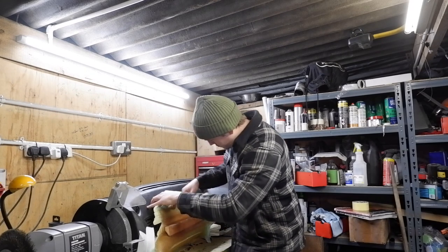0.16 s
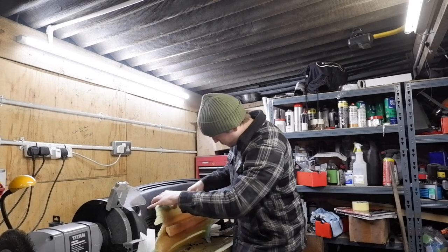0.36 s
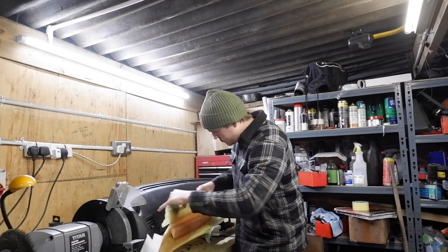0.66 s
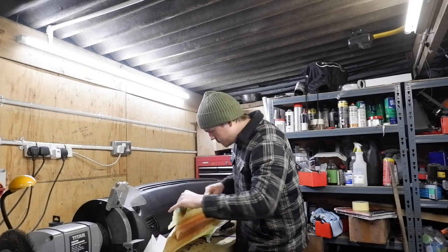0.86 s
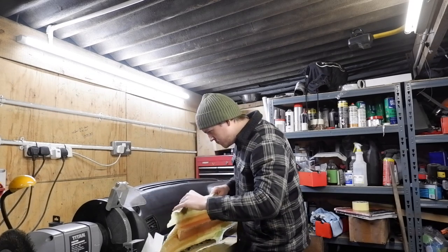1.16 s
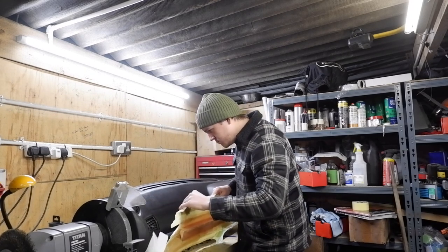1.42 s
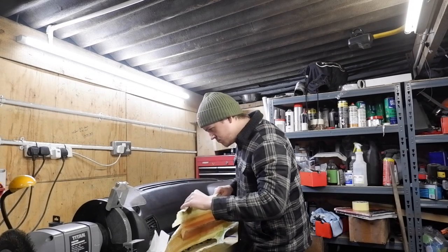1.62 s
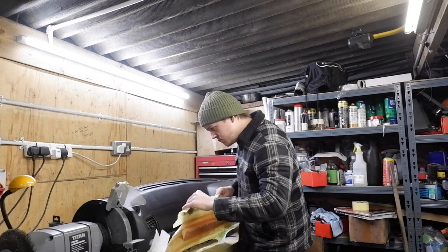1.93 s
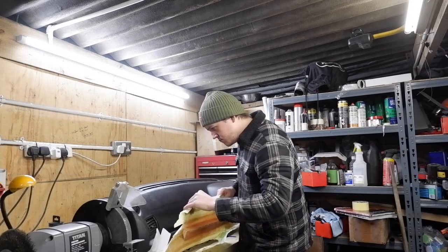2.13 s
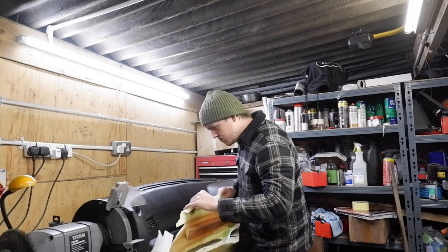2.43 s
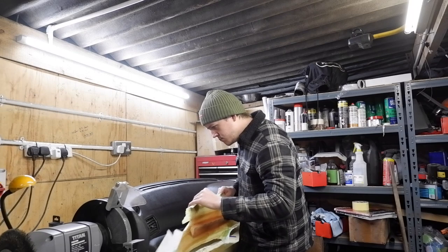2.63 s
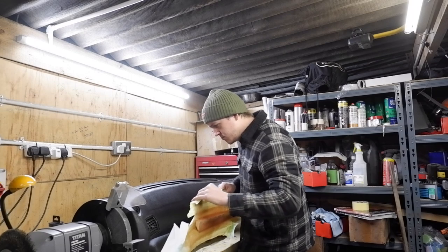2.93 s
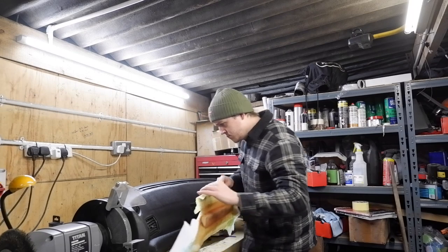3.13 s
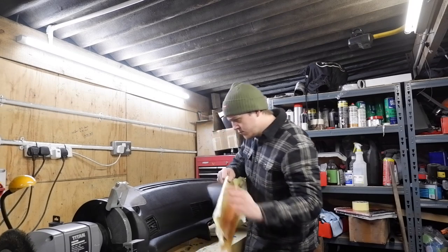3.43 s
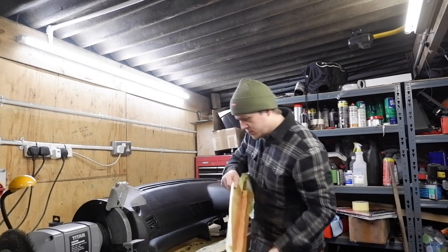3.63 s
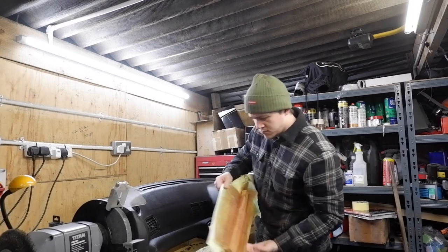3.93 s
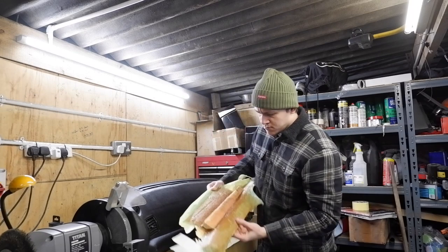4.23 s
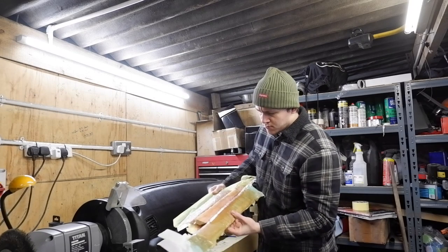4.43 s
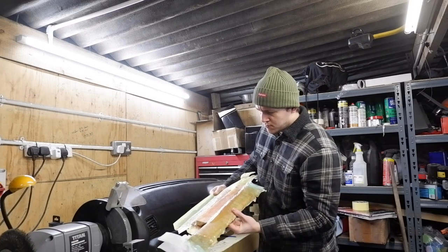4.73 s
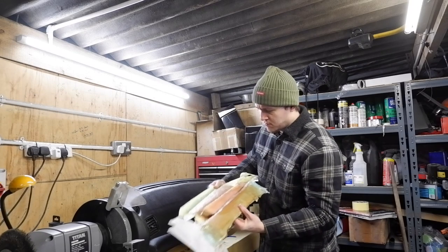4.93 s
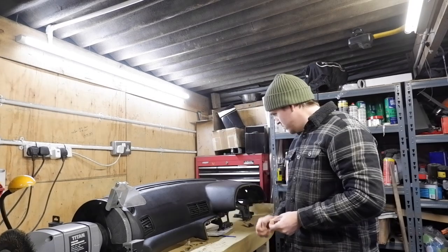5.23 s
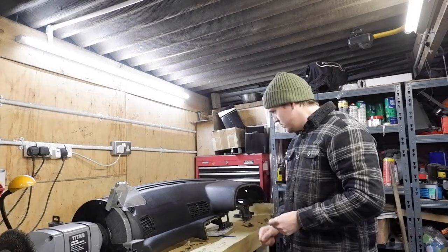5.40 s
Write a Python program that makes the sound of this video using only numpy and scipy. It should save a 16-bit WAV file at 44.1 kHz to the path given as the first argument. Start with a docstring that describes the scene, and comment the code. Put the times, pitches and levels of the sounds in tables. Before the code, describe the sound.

In a small cluttered garage, a stiff moulded shell is pried from a hollow plastic dashboard. Sharp clicks and crackle come thick and loud in the first second, with soft bumps and small squeaks, then thin out. A short creaking flurry follows past two seconds, a splintering burst near four, then quiet handling. Close stereo microphones pick up a short room tail, faint rumble and hiss.

```python
"""A stiff layered mould is peeled off a car dashboard in a small garage, over a faint rumble and hiss.
At first soft bumps, fine crackle and squeaks surround clicks that are strongest within the first second.
Sparser clicks, creaks and crackle follow, with a short flurry at 2.3 s; loud splintering cracks come
near 4.1 s, then quiet handling with two last soft bumps. Cracks and tears are shaped pulses with noisy
rattles, peeling is coloured noise and slips, squeaks are unsteady tones, and bumps are fading low swings."""
import sys
import numpy as np
from scipy import signal
from scipy.fft import rfft, irfft
from scipy.io import wavfile
from scipy.ndimage import uniform_filter1d

SR = 44100
rng = np.random.default_rng(int(sys.argv[2]) if len(sys.argv) > 2 else 0)


def int16_out(signal):
    """Quantize to a 16-bit WAV file."""
    q = np.round(np.clip(np.atleast_2d(signal).T, -1, 1) * 32767)
    wavfile.write(sys.argv[1], SR, q.astype(np.int16))


N = 245195  # length in samples


def cracks(scatter_db=2.5, direct_db=-2.2, run_up_db=-2):
    """Snapping fibres swell up to one sharp pulse; the shell and the surfaces near it rattle after."""
    # single breaks of the bond: start_s, strength_db (relative), pitch_hz,
    # knock_db, snap_db, tick_db (all relative to the strength),
    # clean_share (0-1, limited below: share of the power in one direct pulse)
    breaks = [(0.1824, 2, 1270, -14, -8, -18, 0.063), (0.2309, -2, 1400, -8, -9, -17, 0.024),
              (0.2467, 6.5, 1790, -3, -9, -22, 0.5), (0.25, -9, 1440, -9, 15.5, -0.5, 0.13),
              (0.2944, -4.5, 1940, 3.5, 1.5, 6.5, 0.21), (0.3009, -6, 1820, -4, 5, -3.5, .2),
              (0.4205, -2, 1210, -9, -10, -17.5, 0.17), (0.5623, -1, 1670, -22, -1, -12, 0.4),
              (0.572, -6.5, 1430, -5, -3, -5.5, 0.35), (0.634, 0.5, 1350, -16, -12, -6, 0.24),
              (0.689, 14.5, 1430, -15.5, -5, -22.5, 0.74), (0.8339, -13, 1620, -8, -6, 1.5, .15),
              (0.8697, 19, 1520, -9.5, -8.5, -21, 0.7), (0.9484, 8.5, 1230, -6.5, -3.5, -8, 0.11),
              (0.9581, 10, 1360, -9, -17, -30, 0.74), (0.999, 6.5, 1440, -19, -17, -23, .25),
              (1.0246, 8, 1610, -13.5, -7.5, -16, 0.63), (1.0358, 3.5, 1340, -6, -4, -12.5, .08),
              (1.0938, 0.5, 1530, -9, -9, -13.5, .2), (1.2696, -12, 2300, 9, 0, -8, 0.46),
              (1.466, -3.5, 1500, 5, 4, -10, .3), (1.5088, 3.5, 1980, -12, -11, -6, 0.24),
              (1.5318, 1, 2200, -7, -1, -12, 0.058), (1.6298, -10.5, 2400, -4, -6, -7, 0.16),
              (1.7097, -16.5, 1540, -10, -5, -4, .1), (1.8098, -19.5, 1650, 1, -3, -2, 0.6),
              (1.964, -9, 2380, -9, -10, -14, 0.51), (2.0104, -7.5, 1880, -29, -10, -13.5, 0.52),
              (2.102, -6.5, 2080, -10.5, -11, -9.5, 0.17), (2.231, -0.5, 2040, -32, -4.5, -4.5, .18),
              (2.298, -8, 1630, 5, -8, -6, 0.18), (2.3111, -3, 1720, 6, 1, -7, 0.11),
              (2.342, 14, 2220, -11, -2, -11, 0.67), (2.3512, -3.5, 1820, 4.5, -2, -7, 0.078),
              (2.382, 2.5, 1620, 1.5, -8, -13, 0.16), (2.594, -8, 1150, 6.5, -2, -6.5, 0.052),
              (2.68, 1.5, 1120, -1, -4.5, -15, 0.11), (2.7643, -21, 1380, 20, -8, -12, 0.44),
              (3.114, -8.5, 1630, 1, 2, -7.5, 0.23), (3.363, -9.5, 1450, -2, 5, -4.5, .02),
              (3.5142, -1.5, 1700, -0.5, 1, -26, 0.15), (3.9885, -3, 1450, -8, -5, -5, .02),
              (4.0645, -17, 1580, 8, 5, 0.5, .05), (4.0919, 10, 1750, -13, -1, 2, 0.3),
              (4.107, 10, 1620, -13.5, -4.5, -1.5, 0.13), (4.119, 11.5, 1800, -12.5, -21, 1, 0.38),
              (4.1226, 10, 1930, -14, -11, 3, 0.035), (4.1284, 7, 1740, -16, -1, 0.5, 0.11),
              (4.131, 8, 1500, -2, 4.5, 0.5, 0.045), (4.8467, -7, 1790, -18, -5, -4.5, 0.049),
              (4.864, -6, 1540, 6.5, -2, -13, 0.23)]
    # the less clean a crack, the longer its fibres give way before it
    shortest_run_up_s, extra_run_up_s, clean_scale = 0.00057, 0.014, 0.077
    direct, rattle = np.zeros(N), np.zeros(N)
    t = np.arange(-SR // 50, SR // 8) / SR  # seconds around the break
    decay = rattle_decay(t)
    for start_s, strength_db, pitch_hz, knock_db, snap_db, tick_db, clean_share in breaks:
        pulse = crack_pulse(strength_db, pitch_hz, knock_db, snap_db, tick_db)
        share = np.clip(clean_share, .01, .7)
        run_up_s = shortest_run_up_s + extra_run_up_s * np.exp(-share / clean_scale)
        swell = amp(run_up_db) * np.exp(-abs(t) / run_up_s)
        paths = echo_paths(t) * np.where(t < 0, swell, decay)
        paths /= np.linalg.norm(paths[t >= 0])
        add(direct, start_s, np.sqrt(share) * pulse)
        add(rattle, start_s + t[0], np.sqrt(1 - share) * signal.fftconvolve(paths, pulse))
    return amp(direct_db) * disperse(direct) + amp(scatter_db) * panel(rattle)


def crack_pulse(strength_db, pitch_hz, knock_db, snap_db, tick_db,
                spread=1.19, sub_db=-24, low_db=-4, air_db=-5, top_db=-11):
    """The pulse of one break: a low knock, a broad hump at its pitch, a snap and a bright edge."""
    # the snap lies higher under a brighter tick: 0.12 octave per dB
    snap_hz = max(4240 * 2 ** (0.12 * tick_db), pitch_hz * spread ** 2)
    low = [(60, knock_db + sub_db), (180, knock_db + low_db), (390, knock_db)]
    hump = [(pitch_hz / spread, 0), (pitch_hz * spread, 0), (snap_hz, snap_db)]
    edge = [(6500, tick_db), (8600, tick_db), (10500, tick_db + air_db), (16000, tick_db + top_db)]
    return amp(strength_db) * causal(sorted(low + hump + edge))


def echo_paths(t, lumpy_db=2.0, uneven_db=3.0):
    """Every break lies at another place: its echoes arrive in other clumps and favour other pitches."""
    clumps = unit(uniform_filter1d(rng.standard_normal(len(t)), size=40))
    paths = rfft(rng.standard_normal(len(t)) * amp(lumpy_db * clumps))
    favour = unit(uniform_filter1d(rng.standard_normal(len(paths)), size=50))
    return irfft(paths * amp(uneven_db * favour), len(t))


def rattle_decay(t, scatter_t60_s=.13, near_t60_s=.035, near_db=-2):
    """The room's first echoes and the shell's own brief ring each fade by 60 dB in their t60."""
    return amp(-60 * abs(t) / scatter_t60_s) + amp(near_db - 60 * abs(t) / near_t60_s)


def disperse(x):
    """Bending waves cross the shell faster at high pitch, so a pulse swings both ways."""
    lag = .45  # all-pass filter: delays low pitches more, changes no level
    return signal.lfilter([-lag, 1], [1, -lag], x)


def panel(x, broad_db=-2):
    """The hollow panels pass everything and ring on at their resonances."""
    # resonances of the dashboard and the shell: centre_hz, width_hz, level_db (over the broad response)
    resonances = [(163, 15, 3), (392, 24, 7), (584, 20, 4), (793, 57, -4), (1080, 25, 4), (1525, 56, -4),
                  (2010, 45, -7.5), (2500, 220, -11)]
    out = amp(broad_db) * x
    for centre_hz, width_hz, level_db in resonances:
        ringing = signal.lfilter(*signal.iirpeak(centre_hz, centre_hz / width_hz, SR), x)
        out = out + amp(level_db + broad_db) * ringing
    return out


def tears(level_db=2.0, smear=1.8, smear_t60_s=0.11):
    """The bond lets go as a swarm of small breaks at random moments, each with its own short rattle."""
    # runs of crackle where the bond tears or the shell scrapes: start_s, length_s,
    # strength_db (relative, whole run), pitch_hz, knock_db, snap_db, tick_db (relative to the strength)
    runs = [(0.0, 0.037, -11.5, 1300, 6, -10, -15), (0.195, 0.19, 0.5, 1550, -4.5, 3, -5),
            (0.522, 0.072, 0, 1200, -3.5, -10, -13), (0.65, 0.022, -5, 1450, -13, 1, -13),
            (0.775, 0.035, -4, 1350, -16, -11, -17), (1.031, 0.059, 9.5, 1380, -7.5, -12.5, -18.5),
            (1.175, 0.081, -2.5, 2440, -7.5, -3, -9.5), (1.33, 0.16, -20, 1390, 18, -11, -3),
            (1.485, 0.047, -7, 2020, 5.5, 3, -11), (2.335, 0.16, 5.5, 1550, 1.5, -2, -8.5),
            (2.6, 0.15, -3.5, 1100, 2.5, -1, -8), (3.315, 0.14, -1.5, 1140, 3.5, -7.5, -11.5),
            (3.518, 0.072, 3, 1600, -9, -3, -16.5), (3.7, 0.18, -16, 1200, 11.5, -6, -3),
            (4.31, 0.09, -11.5, 1430, 0, -2, -13)]
    slips_per_s, slip_spread_db = 460, 4.0
    skew = 0.48  # a run swells quickly and dies away more slowly
    out = np.zeros(N)
    keep = amp(-60 / (smear_t60_s * SR)) ** 2  # power left after one sample
    for start_s, length_s, *tone in runs:
        chance = rng.random(SR // 3)
        size, echoes = rng.standard_normal((2, SR // 3))
        progress = np.minimum(np.arange(len(size)) / (length_s * SR), 1)
        swell = np.sin(np.pi * progress ** skew)
        slips = (chance < slips_per_s / SR) * amp(slip_spread_db * size) * swell
        rattle_power = signal.lfilter([1 - keep], [1, -keep], slips ** 2)
        rattle = smear * np.sqrt(rattle_power) * echoes
        swarm = slips * rng.choice([-1, 1], len(slips)) + rattle
        swarm = swarm / (np.linalg.norm(swarm) + 1e-12)
        add(out, start_s, signal.fftconvolve(swarm, crack_pulse(*tone)))
    return amp(level_db) * panel(disperse(out))


def peeling(rub_db=-46, fizz_db=-49, ring=0.29):
    """The shell rubs dully, stirring the panels, while fine bond threads snap; both follow the effort."""
    # how hard the shell is pulled and handled: time_s, effort_db (relative)
    pull = [(0.0, -9.5), (0.4, -9.5), (0.83, -4.5), (1.07, 2.5), (1.24, -11), (1.5, -3.5), (1.76, -18.5),
            (2.03, -13.5), (2.53, -16), (2.67, -8.5), (3.2, -11.5), (3.45, -5.5), (4.0, -8.5), (4.35, -4.5),
            (4.62, -12), (5.2, -17.5), (5.55, -16)]
    # colour of the dull rubbing: pitch_hz, level_db (relative, per Hz)
    rub_colour = [(60, -26), (150, -5.5), (380, 1), (700, -1.5), (1400, -3), (2400, -8.5), (4000, -13),
                  (9000, -29)]
    # colour of the snapping threads: pitch_hz, level_db (relative, per Hz)
    fizz_colour = [(500, -21), (2200, -1.5), (5000, 0), (9000, -1), (16000, -15)]
    fizz_growth = 1.24  # dB of fine crackle for each dB of effort
    effort_db = np.interp(np.arange(N) / SR, *np.transpose(pull))
    slips = colour(grains(per_s=410, spread_db=3.5, smear_t60_s=0.078, smear=1.85), rub_colour)
    rub = wandering(slips + ring * panel(slips), patchy_db=1.5)
    threads = colour(grains(per_s=710, spread_db=2.0, smear_t60_s=0.094, smear=2.5), fizz_colour)
    fizz = wandering(threads, patchy_db=4.0)
    return amp(rub_db + effort_db) * rub + amp(fizz_db + fizz_growth * effort_db) * fizz


def grains(per_s, spread_db, smear_t60_s, smear):
    """Tiny slips at random moments, a few much larger than the rest, each with its own short rattle."""
    size = amp(spread_db * np.minimum(rng.exponential(1, N), 4))
    train = size * rng.choice([-1, 1], N) * (rng.random(N) < per_s / SR)
    keep = amp(-60 / (smear_t60_s * SR)) ** 2  # power left after one sample
    power = signal.lfilter([1 - keep], [1, -keep], train ** 2)
    return unit(train + smear * np.sqrt(power) * rng.standard_normal(N))


def wandering(x, patchy_db):
    """The point of contact moves, so different pitches stand out from moment to moment."""
    z = signal.stft(x, nperseg=1024, noverlap=768)[2]
    patches = uniform_filter1d(rng.standard_normal(z.shape), size=7, axis=0)  # blurred over pitch
    patches = uniform_filter1d(patches, size=8, axis=1)  # and over time
    patchy = z * amp(patchy_db * unit(patches))
    return unit(signal.istft(patchy, nperseg=1024, noverlap=768)[1][:N])


def squeaks():
    """Uneven stick-slip gives a brief fuzzy tone whose pitch changes every couple of cycles."""
    # squeaks and creaks of the shell on the plastic and in the hands:
    # start_s, length_s, pitch_hz, level_db, jitter (pitch wander as a share of the pitch)
    chirps = [(0.42, 0.029, 4420, -56, .05), (0.522, 0.035, 3720, -43, 0.052),
              (0.529, 0.033, 567, -46, 0.15), (1.185, 0.053, 386, -47.5, 0.16),
              (1.946, 0.099, 5030, -59, 0.095), (2.357, 0.056, 403, -39, 0.081),
              (2.595, 0.13, 390, -47.5, 0.1), (2.68, 0.012, 780, -39, 0.029),
              (2.758, 0.017, 496, -47.5, 0.083), (2.761, 0.06, 7860, -56, 0.091),
              (3.315, 0.047, 623, -47.5, 0.12), (3.518, 0.037, 268, -51, 0.047),
              (4.315, .1, 404.6, -57.5, 0.185)]
    out = np.zeros(N)
    for start_s, length_s, pitch_hz, level_db, jitter in chirps:
        wander = uniform_filter1d(rng.standard_normal(SR // 4), size=int(2 * SR / pitch_hz))
        wander = unit(wander)[:round(length_s * SR)]
        tone = np.sin(2 * np.pi * np.cumsum(pitch_hz * (1 + jitter * wander)) / SR)
        faded = tone * signal.windows.tukey(len(tone), .5)
        add(out, start_s, amp(level_db) * unit(faded))
    return out


def bumps(t60_s=0.14, rise_s=0.0013):
    """A soft push starts one low, damped swing."""
    # soft bumps of the body and the work against the bench: start_s, pitch_hz, level_db (before the fade)
    pushes = [(0.084, 175, -48), (.33, 166, -45.5), (.36, 81.5, -46), (.435, 98, -52), (0.445, 167, -44.5),
              (0.891, 190, -39), (5.188, 127, -51), (5.482, 133, -49)]
    out, t = np.zeros(N), np.arange(SR // 4) / SR
    for start_s, pitch_hz, level_db in pushes:
        envelope = amp(level_db - 60 * t / t60_s) * (1 - np.exp(-t / rise_s))
        add(out, start_s, envelope * np.sin(2 * np.pi * pitch_hz * t))
    return out


def garage(x):
    """One diffuse tail of the small, cluttered room, each band dying at its own speed."""
    # echo decay of the garage: pitch_hz, t60_s (time to fade by 60 dB)
    fade_times = [(150, 0.7), (500, 0.24), (1500, 0.32), (6000, 0.4), (10000, 0.27), (15000, 0.3)]
    hz, t, z = signal.stft(rng.standard_normal(SR // 2), SR, nperseg=256)
    build_up = 1 - np.exp(-t / 0.0022)
    fade = amp(-60 * t / read(fade_times, hz)[:, None])
    tail = signal.istft(z * build_up * fade, SR, nperseg=256)[1]
    return signal.fftconvolve(x, tail / np.linalg.norm(tail))[:N]


def noise(points, level_db):
    """Steady noise: random values given a spectrum, then set to an rms level."""
    spectrum = rfft(rng.standard_normal(N))
    shape = amp(read(points, np.fft.rfftfreq(N, 1 / SR)))
    return amp(level_db) * unit(irfft(spectrum * shape, N))


def amp(db):
    """Decibels to gain."""
    return 10 ** (np.asarray(db) / 20)


def unit(x):
    """Scales to rms 1."""
    return x / np.sqrt(np.mean(x ** 2) + 1e-20)


def read(points, hz):
    """Reads a (Hz, value) table on a log-frequency axis."""
    f, value = np.transpose(points)
    return np.interp(np.log(hz + 1), np.log(f + 1), value)


def add(mix, start_s, sound):
    """Mixes a sound in at a time, cutting off what runs past the end."""
    part = mix[max(round(start_s * SR), 0):][:len(sound)]
    part += sound[:len(part)]


def causal(points, size=2048):
    """The pulse with a given (Hz, dB) spectrum whose energy comes as early as possible."""
    cepstrum = irfft(np.log(amp(read(points, np.fft.rfftfreq(size, 1 / SR)))))
    # folding the second half onto the first leaves nothing before the start
    cepstrum[1:size // 2] *= 2
    cepstrum[size // 2 + 1:] = 0
    return irfft(np.exp(rfft(cepstrum)))


def colour(x, points):
    """Filters a signal with a (Hz, dB) spectrum."""
    return signal.oaconvolve(x, causal(points))[:len(x)]


def scene(room_db=-9):
    """Two closely spaced microphones hear the same room; each adds its own hiss."""
    # colour of the room tone: pitch_hz, level_db (relative, per Hz)
    hush_colour = [(25, -9), (60, -3.5), (130, 2.5), (300, 0.5), (550, -4), (1250, -13), (1440, -9.5),
                   (1650, -14.5), (3000, -20.5), (9000, -21), (16000, -66)]
    # colour of each microphone's self-noise: pitch_hz, level_db (relative, per Hz)
    hiss_colour = [(30, 1), (150, 4), (600, 4.5), (1500, -0.5), (6000, -1.2), (16000, 0)]
    hush_db, hiss_db = -58, -54
    # a low cut at the microphones thins the sounds of the work below 56 Hz
    low_cut = signal.butter(3, 56, "highpass", fs=SR, output="sos")
    work = signal.sosfilt(low_cut, cracks() + tears() + peeling() + squeaks() + bumps())
    room = work + amp(room_db) * garage(work) + noise(hush_colour, hush_db)
    return np.array([room + noise(hiss_colour, hiss_db), room + noise(hiss_colour, hiss_db)])


def record(dry):
    """The very highest peaks are rounded off; then a steep filter removes the top treble."""
    knee, headroom = .6, .25  # rounding starts at the knee and adds at most the headroom
    over = np.maximum(abs(dry) - knee, 0)
    rounded = dry - np.sign(dry) * (over - headroom * np.tanh(over / headroom))
    edge = signal.firwin(401, 16100, window=("kaiser", 8), fs=SR)  # cutoff in Hz
    return signal.oaconvolve(rounded, edge[None], "same")


dry = scene()
out = record(dry)
int16_out(out)
```